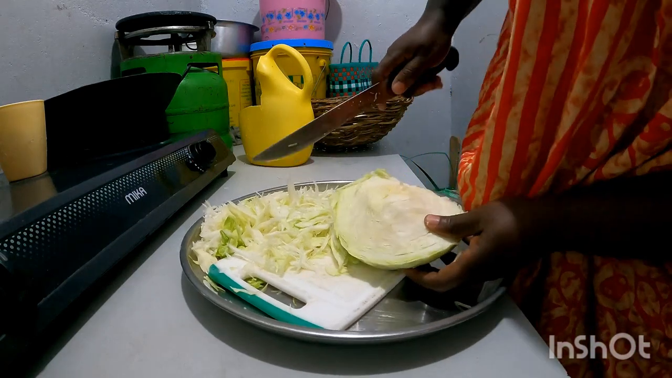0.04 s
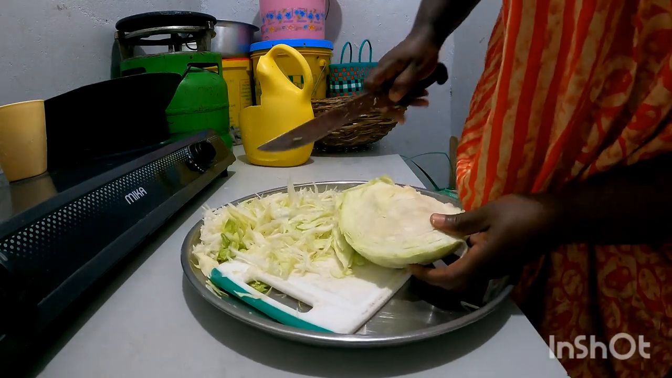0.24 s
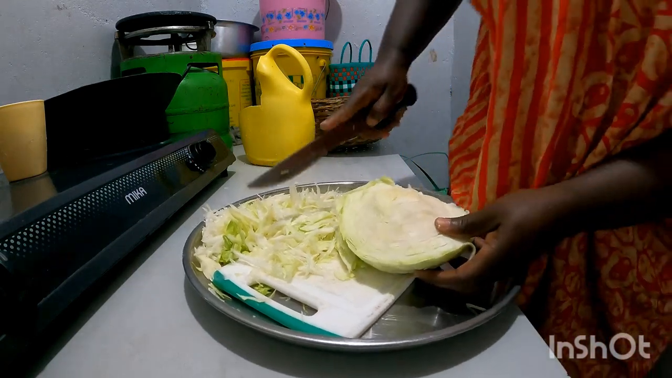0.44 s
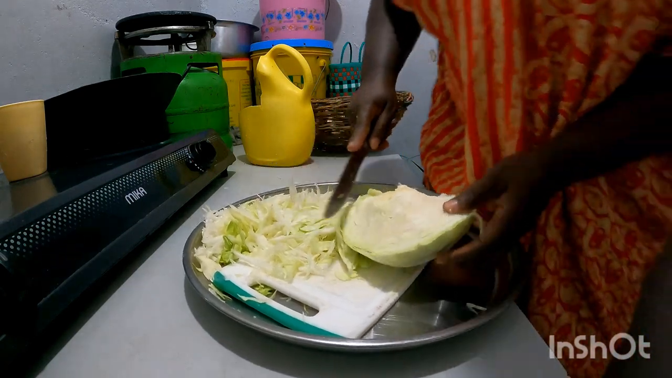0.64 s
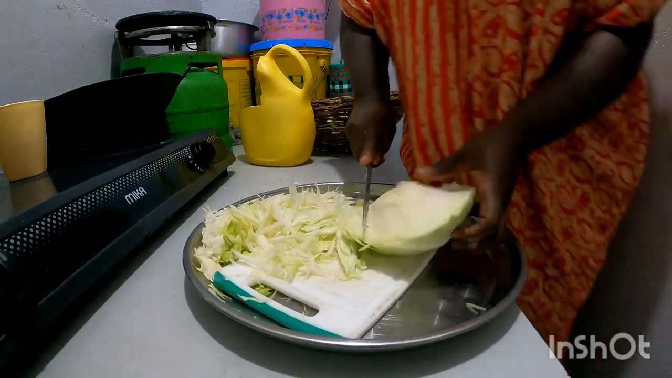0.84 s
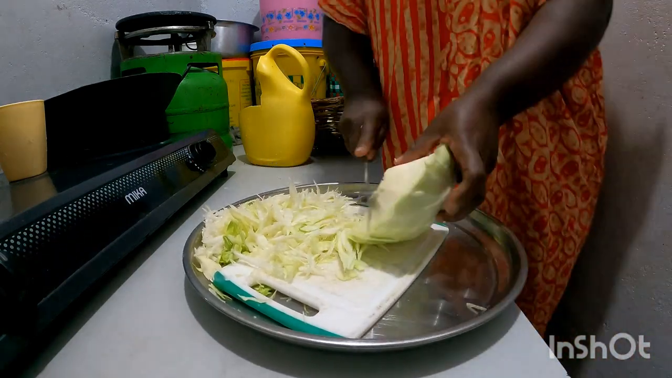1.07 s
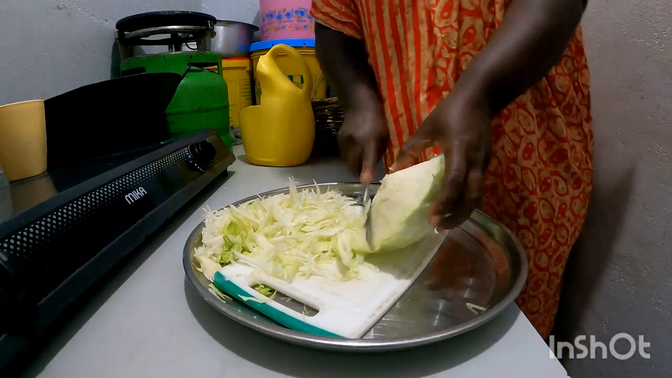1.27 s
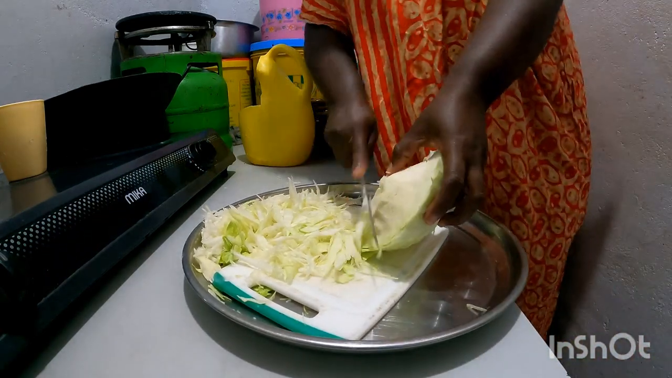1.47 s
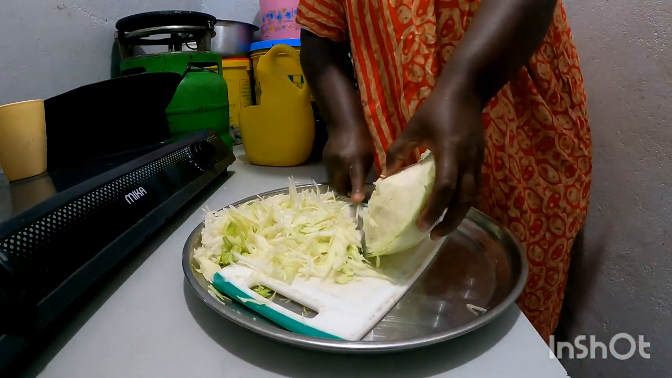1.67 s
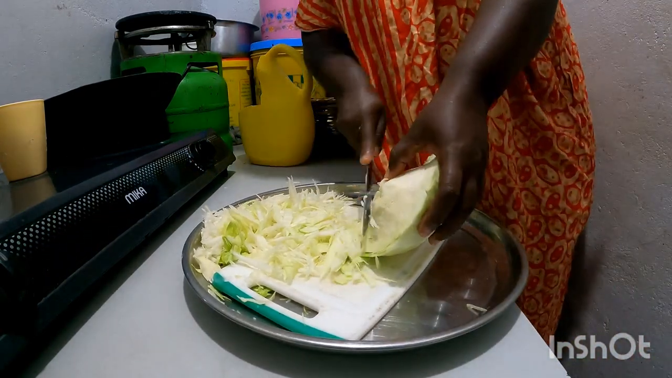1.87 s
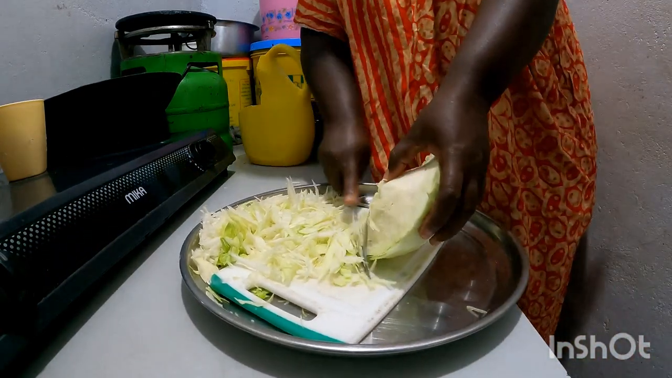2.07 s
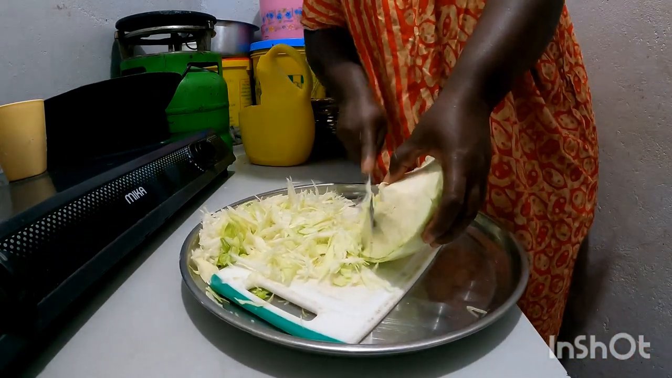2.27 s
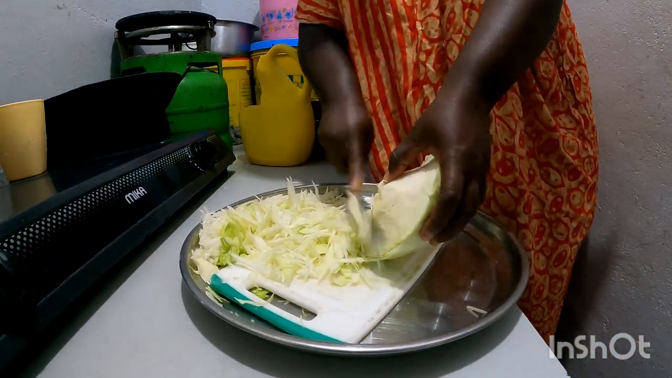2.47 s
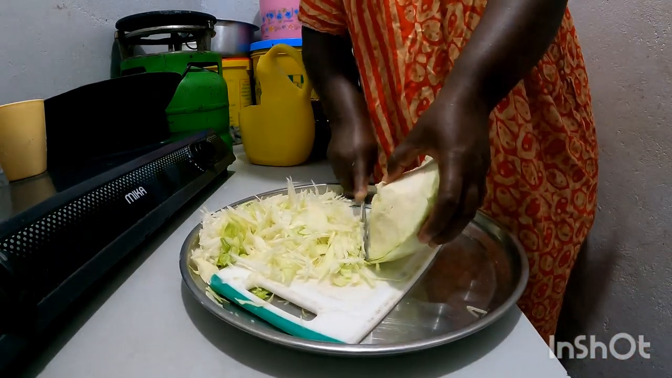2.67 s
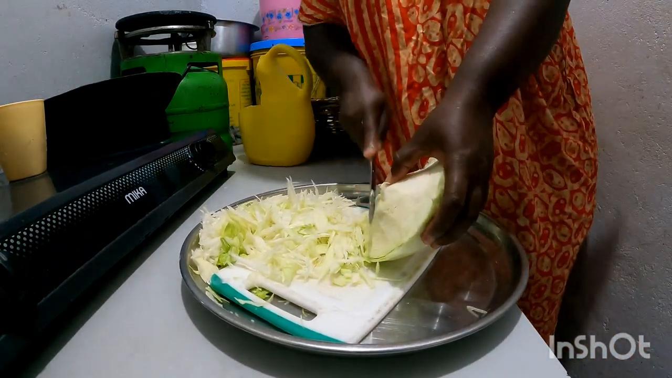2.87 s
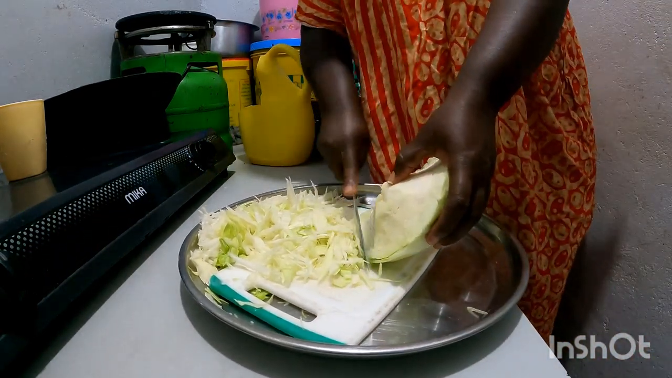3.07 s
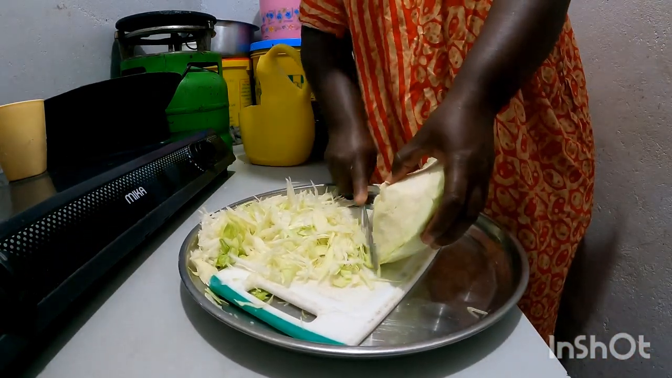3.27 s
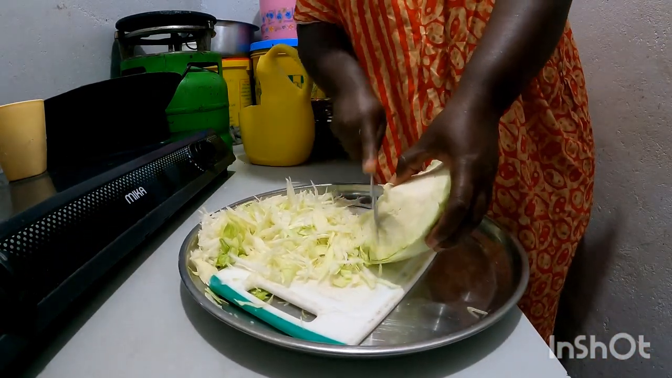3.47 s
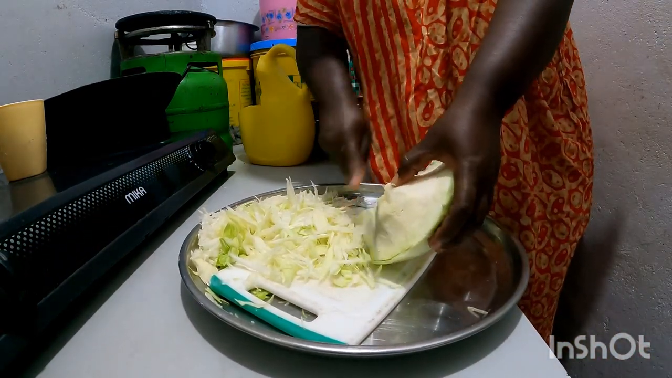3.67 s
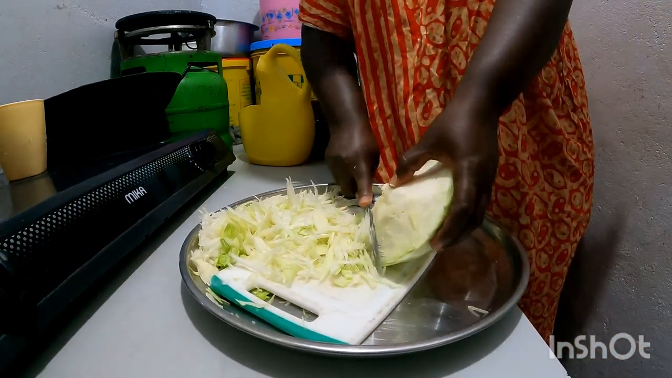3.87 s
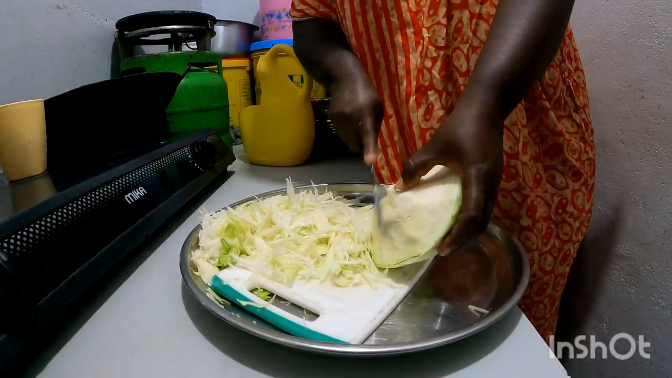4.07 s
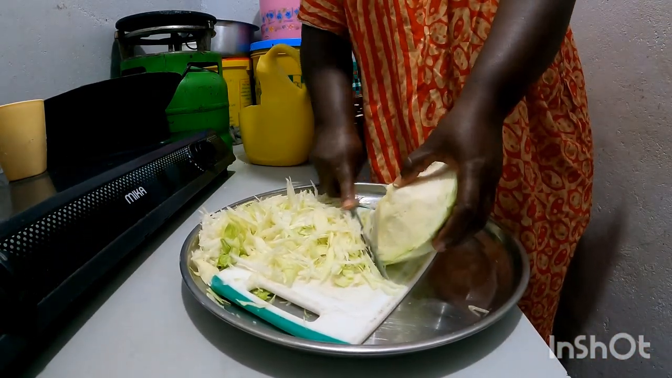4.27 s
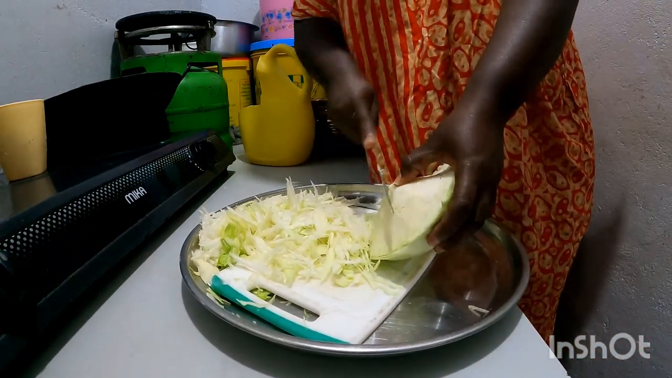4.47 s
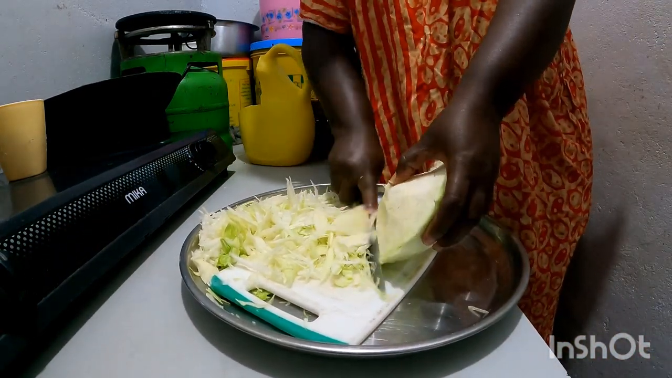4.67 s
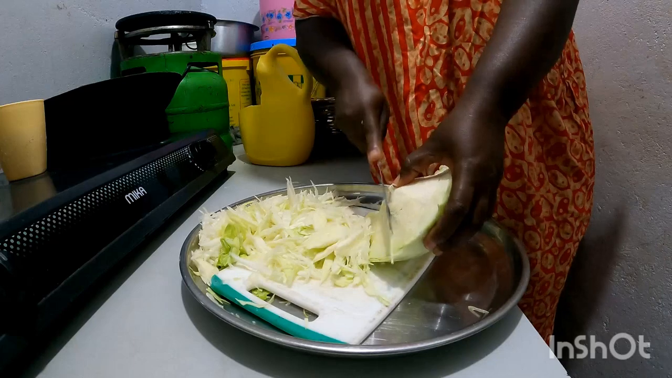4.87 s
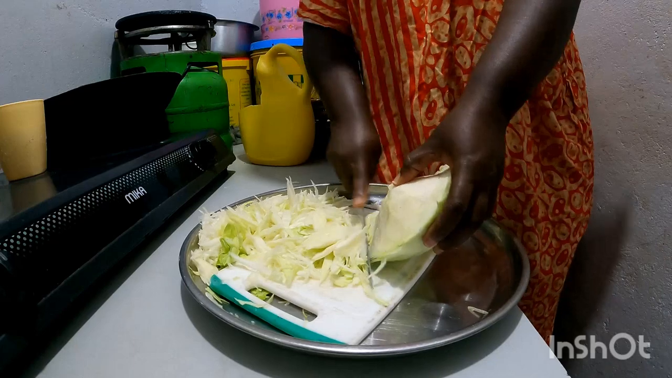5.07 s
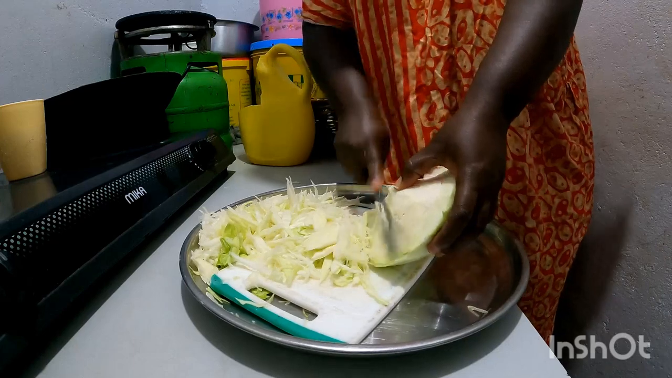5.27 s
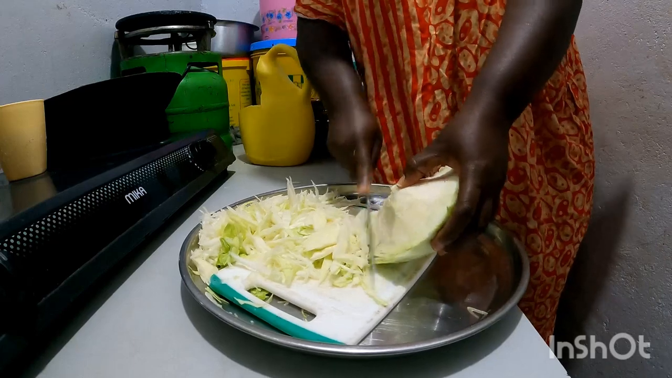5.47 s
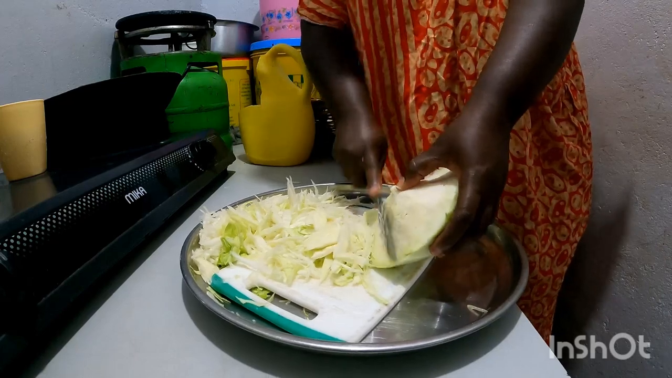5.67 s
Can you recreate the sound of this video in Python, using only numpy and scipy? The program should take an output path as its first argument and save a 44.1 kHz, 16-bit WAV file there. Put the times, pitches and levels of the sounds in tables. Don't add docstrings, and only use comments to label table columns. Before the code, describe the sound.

Close stereo pickup in a small hard-walled kitchen. Soft distant knocks and a brief hollow scrape come first, with a light leaf rustle. Then a knife slices cabbage about three times a second, each crackling crunch usually ending in a sharp snap on a plastic board. The table booms low beneath; a heavy far thump lands among the early cuts.

```python
import sys
import numpy as np
from scipy import signal
from scipy.fft import rfft, irfft
from scipy.io import wavfile
from scipy.ndimage import uniform_filter1d

SR = 44100
rng = np.random.default_rng(int(sys.argv[2]) if len(sys.argv) > 2 else 0)


def digitize_waveform(pressure):
    field = np.atleast_2d(pressure).T
    bounded = np.clip(field, -1, 1)
    quanta = np.round(bounded * 32767).astype(np.int16)
    wavfile.write(sys.argv[1], SR, quanta)


def invert_db(level):
    return 10 ** (np.asarray(level, dtype=float) / 20)


N = 253113
TIME = np.arange(N) / SR


def evened(x):
    return x / np.sqrt(np.mean(x ** 2) + 1e-20)


def read(points, hz):
    f, value = np.transpose(points)
    return np.interp(np.log(hz + 1), np.log(f + 1), value)


def colour(x, points, size=4096):
    gain_db = read(points, abs(np.fft.fftfreq(size, 1 / SR)))
    log_gain = np.log(invert_db(np.maximum(gain_db, -100)))
    minimum_phase = np.exp(np.conj(signal.hilbert(log_gain)))
    taps = np.fft.ifft(minimum_phase).real[:size // 2]
    return signal.oaconvolve(x, taps / np.linalg.norm(taps))[:N]


def ring(x, modes):
    t = np.arange(SR // 2) / SR
    taps = sum(invert_db(db - 60 * t / t60) * np.sin(2 * np.pi * hz * t) for hz, db, t60 in modes)
    return signal.oaconvolve(x, taps / np.linalg.norm(taps))[:N]


def envelope(times, db, fade=0.017):
    inside = np.minimum(TIME - times[0], times[-1] - TIME)
    gate = np.clip(inside / fade + 0.5, 0, 1)
    return gate * invert_db(np.interp(TIME, times, db))


def grains(per_s, spread_db):
    size = invert_db(spread_db * np.minimum(rng.exponential(1, N), 5)) * rng.standard_normal(N)
    return evened(size * (rng.random(N) < per_s / SR))


def clicks(times, db):
    out = np.zeros(N)
    out[np.round(np.asarray(times) * SR).astype(int)] = invert_db(db)
    return out


def bursts(times, db, t60):
    out, t = np.zeros(N + SR), np.arange(SR // 5) / SR
    puffs = rng.standard_normal((len(times), len(t)))
    for s, level, fade, puff in zip(times, db, t60 * np.ones(len(times)), puffs):
        puff = puff * invert_db(-60 * t / fade)
        out[round(s * SR):][:len(t)] += invert_db(level) * puff / np.linalg.norm(puff)
    return out[:N]


# (start [s], length [s], crackle level at the end [dB],
# build-up over the stroke [dB], board minus crackle [dB])
CUTS = [(1.373, 0.12, -28.5, -4, 6), (1.699, 0.11, -25.5, 6, 7), (2.036, 0.07, -22, 8.5, 7),
        (2.378, 0.097, -25.5, 8, 8), (2.701, 0.088, -28.5, 6.5, 3), (3.020, 0.039, -28.5, 0, 2.5),
        (3.326, 0.098, -30, 1.5, 9.5), (3.608, 0.028, -30, -2, 3), (3.884, 0.0794, -29, 8, 7),
        (4.208, 0.078, -29.5, 6.5, 6.5), (4.639, 0.12, -25.5, 16, -4), (5.024, 0.086, -32.5, 10.5, 5),
        (5.333, 0.11, -36, 7, 1)]
# (middle [s], length [s], level [dB])
RUSTLES = [(1.035, 0.3, -34), (1.227, 0.034, -48), (1.29, 0.042, -53), (1.642, 0.091, -46),
           (1.944, .05, -56), (2.96, .025, -52), (3.816, 0.029, -48), (4.009, 0.18, -37.5),
           (4.581, 0.059, -41.5), (4.63, 0.059, -46.5), (5.621, 0.055, -39)]
# (frequency [Hz], level [dB per Hz])
LEAF_COLOUR = [(1500, -8.5), (2500, -2.5), (3800, -4), (5500, -3.5), (7000, -6), (8500, -12.5),
               (10300, -10), (12500, -19.5), (14500, -25), (16000, -50)]
# (frequency [Hz], level [dB per Hz])
SHAKE_COLOUR = [(180, -35.5), (330, -27), (580, -16), (850, -4), (1150, 5), (1500, -11.5), (1900, -4.5),
                (2800, -11.5), (4500, -10), (9000, -75)]


def strokes():
    bite_s, bite_db = 0.034, -20.5
    lift_s, lift_db = 0.081, -36.5
    board_build_db = 6.5
    push_db, push_build_db, push_linger = 4, 6.5, 1.66
    ahead = np.array([-1, -1, 0, 0])
    crackle, shake, push = np.zeros((3, N))
    for start, length, db, build_db, board_db in CUTS:
        bite, end = start + bite_s, start + max(length, bite_s + 0.005)
        cut = [start, bite, end, end + lift_s]
        ease = [start, bite, end, end + push_linger * lift_s]
        shape_db = db + np.array([bite_db - build_db, -build_db, 0, lift_db])
        crackle += envelope(cut, shape_db)
        shake += envelope(cut, shape_db + board_db + board_build_db * ahead)
        push += envelope(ease, shape_db + push_db + push_build_db * ahead)
    for middle, length, db in RUSTLES:
        u = np.clip(2 * (TIME - middle) / length, -1, 1)
        brush = invert_db(db - 17.5 * u ** 2) * (abs(u) < 1)
        crackle += brush
        shake += invert_db(-27) * brush
    crunch = np.clip(crackle / invert_db(-27.0), 0, 1)
    layers = evened(uniform_filter1d(rng.standard_normal(N), 300))
    clumps = invert_db(4.2 * crunch * layers)
    popping = crunch * grains(per_s=7000, spread_db=2.6)
    hiss = np.sqrt(1 - crunch ** 2) * rng.standard_normal(N)
    cells = clumps * (popping + hiss)
    fibres = clumps * grains(per_s=5000, spread_db=1.0)
    leaves = invert_db(-3.0) * colour(crackle * cells, LEAF_COLOUR)
    board = invert_db(-2.0) * colour(shake * fibres, SHAKE_COLOUR)
    return leaves + board, push * rng.standard_normal(N)


# (time [s], peak level [dB], tick minus peak [dB], board minus peak [dB],
# push on the table minus peak [dB])
SNAPS = [(0.8328, -34, -4, -6, -9), (1.4089, -21, 6.5, 2, -43), (1.443, -12, -18, -1.5, -14),
         (1.4771, -14, -0.5, -5.5, -47), (1.7585, -13.5, -3, 3.5, -12), (1.812, -34, -4, 15, 11.5),
         (2.0778, -24, -16, 8, -14), (2.1159, -7, -38, 0, -12), (2.4816, -15, -29, 6.5, -10.5),
         (2.761, -15, -21, -4, -14), (2.789, -24.5, -8, -18, -4.5), (3.0672, -8.5, -10.5, -7.5, -20.5),
         (3.0712, -11.5, -4, -4, -28), (3.0767, -3, -13.5, -3.5, -13.5), (3.344, -24.5, -10, 3, -12.5),
         (3.4445, -15.5, -30, 9.5, -27), (3.6466, -1, -72, -4, -16), (3.9504, -24, -24, 4.5, -6),
         (3.9965, -35, -17, -30, -3.5), (4.3039, -6.5, -9.5, 0.5, -17.5), (4.763, 0.5, -6, -3.5, -16.5),
         (5.1117, 0.5, -32, -4.5, -30.5), (5.4327, 0, -10.5, -6.5, -22.5)]
# (frequency [Hz], level [dB per Hz])
EDGE_COLOUR = [(2000, -14), (2800, -3), (3600, -3), (5000, 0), (6500, -5), (8000, -16), (12000, -24),
               (16000, -36), (20000, -50)]
# (frequency [Hz], level [dB per Hz])
BOARD_COLOUR = [(150, -33), (300, -7), (550, -25), (1150, 5.5), (1700, 5), (2400, -3.5), (4000, -51)]


def edge_on_board(edge, board):
    return colour(edge, EDGE_COLOUR) + colour(board, BOARD_COLOUR)


def snaps():
    s, db, tick_db, board_db, push_db = np.transpose(SNAPS)
    loudest_db = db + np.maximum(board_db, 0)
    edge_db, board_db = db + 12.0, db + board_db + 18.5
    cushion = 1.5 + 0.1 * np.maximum(-5 - loudest_db, 0)
    rattle = edge_on_board(bursts(s, edge_db, t60=0.012 * cushion), bursts(s, board_db, t60=0.014 * cushion))
    even = edge_on_board(clicks(s, edge_db), clicks(s, board_db))
    lost_db = -12.0 * (cushion - 1)
    sharp = edge_on_board(clicks(s, edge_db + lost_db), clicks(s, board_db + lost_db))
    tick_colour = [(3000, 2), (7000, -14), (11000, -17), (16000, -39), (22000, -33)]
    tick = colour(bursts(s, db + tick_db + 22.0, t60=0.0058), tick_colour)
    return rattle, tick + 0.39 * sharp, even, clicks(s, db + push_db + 33.0)


# (frequency [Hz], level [dB], time to die by 60 dB [s])
TABLE_MODES = [(39.2, -3.5, 0.52), (50.6, 1, 0.08), (65, 7, 0.33), (148.1, 5, 0.26), (213.7, -4, 0.22),
               (259.5, -1, 0.19), (404, -36, 0.41)]


def table(push):
    return ring(push, TABLE_MODES)


# (delay [s], level [dB], highest frequency [Hz])
ECHOES = [(.0025, -3.5, 8800), (.0085, -3, 7000), (.0115, -6.5, 3030), (0.0151, -9.5, 4800),
          (.0235, -5.5, 2000), (0.028, -3, 1870)]


def first_echoes(x):
    out = np.zeros((2, N))
    for (s, db, top_hz), skew in zip(ECHOES, rng.integers(-4, 5, len(ECHOES))):
        dull = signal.butter(3, top_hz, fs=SR, output="sos")
        echo = invert_db(db) * signal.sosfilt(dull, x)
        out += [np.roll(echo, round(s * SR)), np.roll(echo, round(s * SR) + skew)]
    return out


# (frequency [Hz], time to die by 60 dB [s])
KITCHEN_T60 = [(200, 0.34), (600, 0.57), (1200, 0.49), (4000, 0.55), (8000, 0.39), (14000, 0.19)]


def kitchen(x, start_s):
    taps, alike = np.zeros((2, SR)), 0.85
    at = np.arange(round(start_s * SR), SR - 20, 20)
    at = at + rng.integers(0, 20, (2, len(at)))
    np.put_along_axis(taps, at, rng.choice([-1., 1.], at.shape), 1)
    taps[1] = alike * taps[0] + np.sqrt(1 - alike ** 2) * taps[1]
    hz, t, z = signal.stft(taps, SR, nperseg=256)
    dying = invert_db(-60 * t / read(KITCHEN_T60, hz)[:, None])
    tail = signal.istft(z * dying, SR, nperseg=256)[1]
    return signal.fftconvolve(x[None], tail / np.linalg.norm(tail[0]), axes=1)[:, :N]


# (frequency [Hz], level [dB])
WALL_COLOUR = [(200, 2), (1200, 4.5), (2500, -0.5), (4500, -2), (6500, -5.5), (9000, -5.5), (13000, -8),
               (16000, -57)]


def late_echoes(cut, snap):
    sent = invert_db(-17.0) * cut + invert_db(-10.0) * snap
    return kitchen(colour(sent, WALL_COLOUR), 0.013)


# (time [s], peak level [dB], boom minus peak [dB], thump minus peak [dB],
# dullness [dB per octave])
KNOCKS = [(0.072, -26, -39, -10.5, -12), (0.34, -42, 7, -15, -6), (0.459, -31.5, -19, -23, -28),
          (0.612, -37.5, -10, 1.5, -8.5), (0.687, -30.5, 1, -5.5, -23), (0.758, -35, -9, 5.5, -21),
          (2.221, -10, 7.5, 0, -27), (2.232, -7.5, -14, -11.5, -18), (2.25, -19.5, 13.5, -12, -26),
          (2.299, -21, 22, -12, -30), (3.56, -40, 6, 14, -28), (3.587, -37.5, 25, -1, -31),
          (4.69, -36, 10, -5.5, -27), (5.628, -34.5, 5, -37, -9.5)]
# (frequency [Hz], level [dB per Hz])
CLACK_COLOUR = [(290, -37), (500, -6), (688, -16), (910, -6), (1630, -5), (2780, -7), (3670, -29),
                (4310, -16), (12000, -51), (15600, -75), (22000, -120)]
# (frequency [Hz], level [dB], time to die by 60 dB [s])
FLOOR_MODES = [(32, 3.5, 0.52), (70.8, -5, 0.82), (133.3, -6.5, 0.2), (285, -12, 0.13)]


def knocks():
    top_hz = 1296
    thump_colour = [(40, -46), (120, -5), (350, 4.5), (700, -18.5), (3000, -40.0), (9000, -89)]
    far, boom = np.zeros((2, N))
    for k, (s, db, boom_db, thump_db, tilt_db) in enumerate(KNOCKS):
        blow = 0.4 * clicks([s], [db + 27.5]) + bursts([s], [db + 24.0], t60=0.025)
        dull_colour = [(250, -10), (500, -4), (top_hz, 0), (16 * top_hz, 4 * tilt_db)]
        far += colour(blow, dull_colour if k else CLACK_COLOUR)
        far += colour(invert_db(thump_db) * blow, thump_colour)
        boom += clicks([s - 0.004], [db + boom_db + 25.5])
    soft_blow = signal.oaconvolve(boom, np.hanning(120) / 60, "same")
    return far, ring(soft_blow, FLOOR_MODES)


# (time [s], level [dB])
DRAG = [
    (0.66, -39),
    (0.69, -45),
    (0.78, -33.5),
    (1.078, -33.5),
    (1.272, -39),
    (1.378, -38.5),
]
# (frequency [Hz], width [Hz], level [dB])
DRAG_RINGS = [(721, 38, -2), (926, 29, -2), (1060, 91, -4), (1780, 130, -5), (2420, 150, -1),
              (2800, 180, -3)]
# (frequency [Hz], level [dB per Hz])
DRAG_COLOUR = [(120, -56), (200, 0), (465, -1), (715, -59), (968, -12), (1100, 7.5), (2750, 1.5),
               (3400, -19.5), (9000, -30), (19800, -120)]


def drag():
    times, level_db = np.transpose(DRAG)
    rub = envelope(times, level_db, fade=0.022) * grains(per_s=5600, spread_db=2.0)
    hollow = [(hz, db + 10 * np.log10(width), 2.2 / width) for hz, width, db in DRAG_RINGS]
    return invert_db(-8.5) * (colour(rub, DRAG_COLOUR) + 0.9 * ring(rub, hollow))


# (time [s], level [dB])
BUSTLE = [(0.0, -34), (0.5, -36), (1.0, -39), (1.8, -41.5), (2.6, -38), (3.2, -42), (3.7, -36),
          (4.2, -44.5), (4.7, -46), (5.2, -44), (5.74, -52)]
# (frequency [Hz], level [dB per Hz])
RUMBLE_COLOUR = [(8.8, -5), (15, 7.5), (32, 2.5), (91, -2.5), (145, -5.5), (282, -15.5), (361, -23.5),
                 (454, -20), (514, -52), (547, -7.5), (600, -56), (780, -62), (1320, -120)]
# (frequency [Hz], level [dB per Hz])
AIR_COLOUR = [(180, -28), (300, -7), (474, -7), (1150, 1.5), (2820, -6.5), (3270, -13), (5260, -9),
              (11900, -27), (15000, -48)]


def background():
    bustle = invert_db(np.interp(TIME, *np.transpose(BUSTLE)))
    for s, db, boom_db, *_ in KNOCKS:
        bustle = bustle + (TIME > s) * invert_db(db + boom_db - 17 - 60 * abs(TIME - s) / 0.2)
    swell = np.hanning(901) / 450
    bustle = signal.oaconvolve(np.pad(bustle, 450, "edge"), swell, "valid")
    lumps = invert_db(2.0 * evened(uniform_filter1d(rng.standard_normal(N), 3000)))
    rumble = bustle * evened(colour(lumps * rng.standard_normal(N), RUMBLE_COLOUR, size=16384))
    a, b = (colour(z, AIR_COLOUR) for z in rng.standard_normal((2, N)))
    air = invert_db(-49.5) * (100 * bustle) ** 0.2
    return rumble + air * np.array([a + 0.9 * b, a - 0.4 * b])


def scene():
    cut, push = strokes()
    rattle, tick, even, thud = snaps()
    far, boom = knocks()
    near = cut + rattle + tick + invert_db(-1.5) * first_echoes(cut + rattle)
    near = near + late_echoes(cut, even) + table(push + thud)
    distant = far + drag()
    return near + invert_db(-8.0) * distant + kitchen(distant, 0.004) + boom + background()


def roll_off(x):
    return signal.sosfilt(signal.butter(12, 20000, fs=SR, output="sos"), x)


# (frequency [Hz], left minus right [dB])
LEFT_DB = [(60, 1.5), (180, 1.5), (550, 1.0), (1650, 2.5), (4970, 1.2), (15000, 1.0)]
# (frequency [Hz], lead of the left [radians])
LEFT_LEAD = [(50, -.06), (200, -.29), (700, -.82), (3000, -.78), (6000, -.48), (10500, -.55), (12000, -1.3),
             (15000, -2.1)]


def record(dry):
    hz = np.fft.rfftfreq(N, 1 / SR)
    tilt = invert_db(read(LEFT_DB, hz) / 2) * np.exp(0.5j * read(LEFT_LEAD, hz))
    band_limit = 1 / np.sqrt(1 + (hz / 15400) ** 44)
    heard = rfft(dry) * band_limit * np.array([tilt, 1 / tilt])
    upper = 1 / (1 + (350 / (hz + 1)) ** 4)
    treble, bass = irfft(heard * upper, N), irfft(heard * (1 - upper), N)
    power = uniform_filter1d((treble ** 2).mean(0), 900)
    level_db = 10 * np.log10(abs(power) + 1e-12)
    gate = invert_db(-0.8 * np.clip(-38.0 - level_db, 0, 14))
    return roll_off(np.clip(bass + gate * treble, -1, 1))


dry = scene()
out = record(dry)
digitize_waveform(out)
```